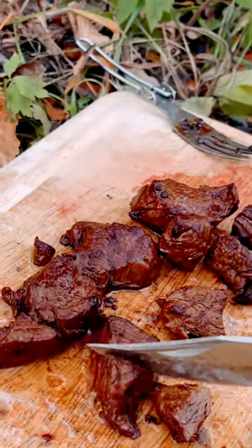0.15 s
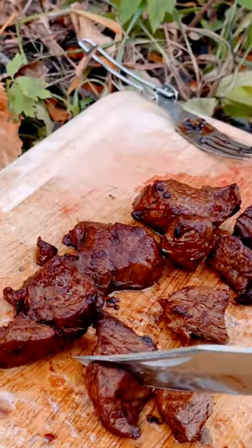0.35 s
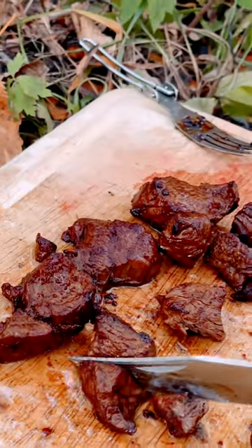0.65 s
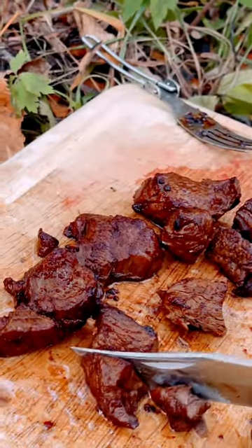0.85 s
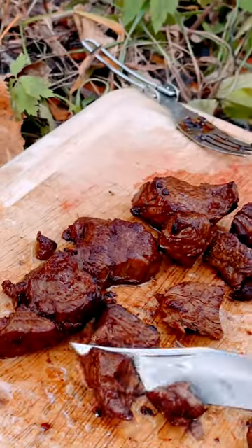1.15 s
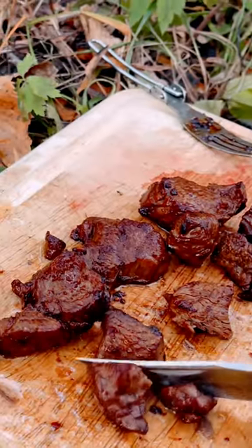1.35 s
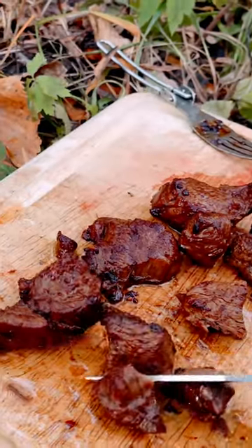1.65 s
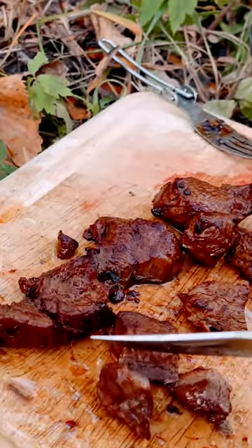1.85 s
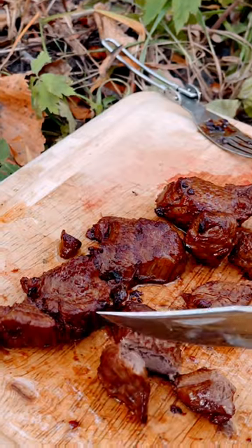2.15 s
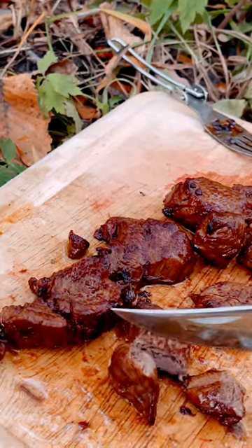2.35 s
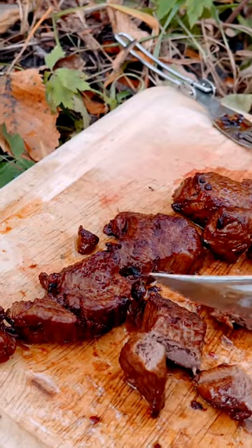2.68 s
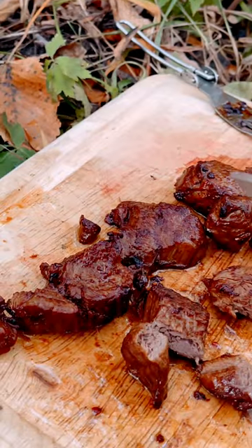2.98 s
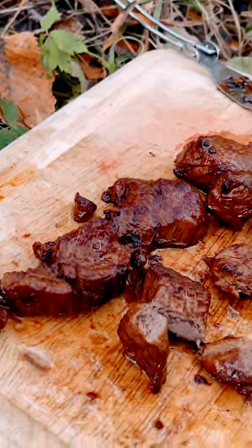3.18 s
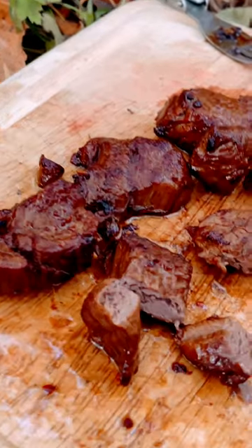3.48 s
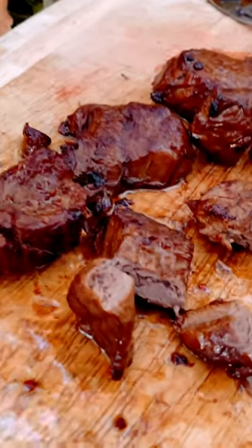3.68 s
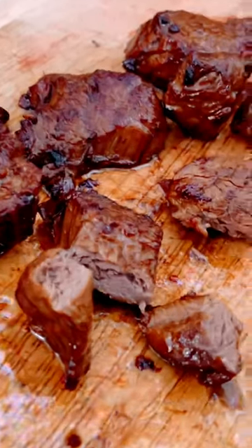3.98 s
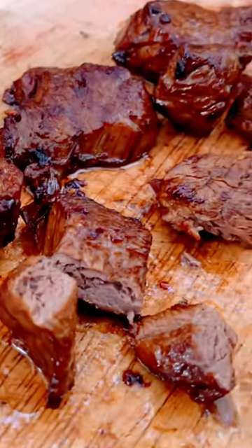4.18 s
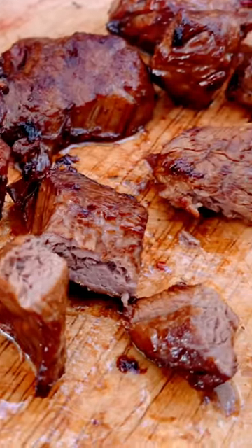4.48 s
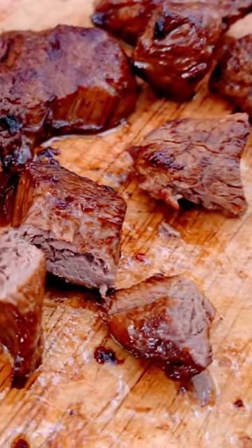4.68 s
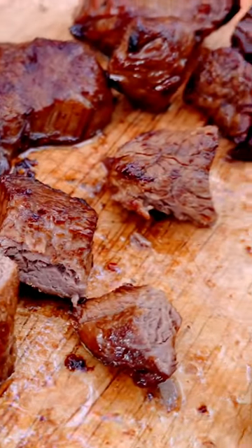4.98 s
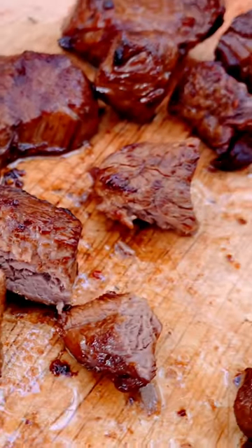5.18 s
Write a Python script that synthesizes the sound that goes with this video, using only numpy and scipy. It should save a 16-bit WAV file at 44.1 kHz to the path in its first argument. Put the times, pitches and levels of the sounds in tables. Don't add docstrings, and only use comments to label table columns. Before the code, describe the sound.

Outdoors, very close in stereo, with a quiet bed of airy hiss, low rumble and a faint wavering engine hum around 130 Hz. A small dry tick at 0.2 s starts the knife work; around 0.45 to 0.6 s ticks run into a fast cluster of short wooden knocks on the board. Light, crisp clicks and barely audible gritty slides continue irregularly to about 1.7 s. Then it is almost empty, with tiny ticks near 2.0 and 2.6 s and a faint short bird whistle at 3.1 s. Around 3.3 s come a couple of ticks and a soft narrow creak. From 3.65 s a much louder crunch of dry crust and litter swells in: dense fine crackle in pulses until about 4.5 s, then looser, separate snaps and hollow pops, especially sharp near 4.3, 4.65, 4.85 and 5.15 s. A thin falling bird whistle at 5.1 s is nearly masked.

```python
import sys
import numpy as np
from scipy import signal
from scipy.fft import rfft, irfft, next_fast_len
from scipy.io import wavfile

SR = 44100
rng = np.random.default_rng(int(sys.argv[2]) if len(sys.argv) > 2 else 0)


def waveform_to_disk(signal):
    frames = np.transpose(np.atleast_2d(signal))
    scaled = np.clip(frames, -1, 1) * 32767
    samples = np.round(scaled).astype(np.int16)
    wavfile.write(sys.argv[1], SR, samples)


def attenuation_scalar(level_db):
    decades = np.asarray(level_db, float) / 20
    return 10 ** decades


N = 235185
STEP = 40

# f/Hz, phase/rad
CRUSH_PHASE = [(0, -0.5), (860, -2.5), (4310, -7), (5860, -11), (6550, -11.5), (8010, -20.5), (8870, -20),
               (12700, -25.5), (14900, -30), (16500, -26)]
# f/Hz, level/dB
CRUSH_BALANCE = [(60, -5), (150, 0), (380, -3.5), (950, -4.5), (2380, -2), (5980, 1), (15000, -0.5)]
# t/s, crack peak level/dB, lowest mode level/dB, upper modes level/dB
BOARD_KNOCKS = [(0.515, -39.5, -65, -48.5), (0.532, -39, -60, -51), (0.544, -35.5, -41, -41.5),
                (0.551, -41.5, -45, -41), (0.56, -43.5, -34.5, -39), (0.611, -58, -64, -58),
                (0.671, -66, -68, -64), (0.775, -62, -61, -63), (0.8, -55, -50, -49.5),
                (0.819, -51, -60, -63), (1.734, -57, -67, -54.5), (3.289, -51, -72, -64)]


def crushing():
    # t/s, crack peak level/dB, middle level re crack/dB, treble tilt/(dB per octave)
    brittle = [(3.445, -56, -8, -17), (3.683, -29.5, -35, 11), (3.715, -26.5, -14, 5),
               (3.872, -28, -13.5, -11.5), (3.953, -34.5, -7.5, -9), (4.025, -28.5, -15, -5),
               (4.061, -30.5, -10, -3), (4.226, -36, -26, -3), (4.284, -18.5, -20, -5),
               (4.312, -35, -5.5, -8), (4.353, -39, -31, -4), (4.39, -36, -29, 4.5), (4.408, -40, -18, 3),
               (4.611, -37.5, -11, -8), (4.658, -35, -23, -6), (4.709, -44, -29, 11),
               (4.748, -38, -17, -13), (4.772, -31.5, -19, -1.5), (4.818, -33, -27, -3),
               (4.835, -23.5, -30, -2), (4.854, -33, -15, 9), (4.991, -36, -24, 2),
               (4.999, -34.5, -38, 7.5), (5.013, -34.5, -10.5, 2), (5.037, -44, -16, -11),
               (5.065, -38, -13, -2), (5.113, -34, -11, -1.5), (5.141, -17, -28, -8), (5.213, -31, -25, -6),
               (5.226, -22.5, -39, -6.5)]
    # t/s, crack peak level/dB, knock level re crack/dB, middle level re crack/dB
    pops = [(3.71, -31.5, -15, -26), (3.73, -31, -5, -17), (3.775, -24.5, -17, -17), (3.797, -28, -9, -27),
            (3.808, -25, -11.5, -7), (3.85, -32, -10, -8), (3.895, -32, -13, -17), (3.932, -32.5, -13, -13),
            (3.982, -24.5, -5, -10), (4.074, -30, -19, -9.5), (4.131, -33, -15, -7.5),
            (4.151, -22.5, -20.5, -11), (4.243, -33, -21, -13), (4.332, -31.5, -24, -6),
            (4.428, -37, -17, -11), (4.453, -31.5, -13.5, -15), (4.519, -29.5, -14, -11),
            (4.649, -17, -24, -42), (4.698, -46, -35, -30), (4.795, -48, -13, -6), (4.842, -20, -21, -30),
            (4.866, -22, -21.5, -32), (4.936, -28.5, -18.5, -18.5), (5.086, -45, -16, -1),
            (5.118, -33.5, -14, 1), (5.151, -22.5, -32, -18), (5.169, -22, -5.5, -11),
            (5.183, -42, -23, -26), (5.234, -40.5, -11.5, -24), (5.299, -39.5, -16, -13)]
    # t/s, hold/s, fine crackle level/dB, coarse grain level re fine/dB
    presses = [
        (3.64, 0.19, -46.5, -8),
        (3.94, 0.14, -54, -2.5),
        (4.2, 0.087, -52.5, -6),
        (4.44, 0.012, -67, 0.5),
        (4.521, .025, -55.5, -7.5),
        (4.84, 0.098, -66.5, -5),
        (4.6, .75, -68, -16),
    ]
    pop_hz = 899
    hollow = [(s, db, pop_hz, *rest) for s, db, *rest in pops]
    rows = in_full(brittle, pop_hz, knock_db=-36, hollow=hollow, tilt_db=0.8)

    s, held, fine_db, coarse_db = np.transpose(presses)
    span = 3.05, 6
    fine = grains(span, low_hz=3750, high_hz=16300, count=13, cycles=9.9, per_s=5000, size_db=4.0, own=1.0)
    medium = grains(span, low_hz=1480, high_hz=4000, count=6, cycles=8.2, per_s=3300, size_db=4.0, own=0.64)
    cavities = grains(span, low_hz=690, high_hz=1320, count=6, cycles=9.1, per_s=1500, size_db=3.0, own=0.31)
    fine_gain = effort(s, held, fine_db, rise_db=107, fall_db=350, level_db=3.9)
    fine_gain = fine_gain + crumbs(rows, level_db=-19.0, t60=0.041)
    bed = fine_gain * fine
    bed += effort(s, held, fine_db + coarse_db, rise_db=56, fall_db=150, level_db=0) * medium
    bed += effort(s, held, fine_db + coarse_db, rise_db=350, fall_db=76, level_db=2.4) * cavities

    hits = snaps(rows, part_db=[3.0, -3.0, -11.0], part_t60=[.021, .012, .007],
                 spread_s=0.002156, own_db=15.5)
    return ports(hits + bed, CRUSH_PHASE, CRUSH_BALANCE)


def creak():
    # t/s, level/dB
    swell = [(3.25, -87), (3.36, -65), (3.45, -56.5), (3.55, -56), (3.66, -68), (3.8, -95)]
    s, level_db = np.transpose(swell)
    gain = attenuation_scalar(np.interp(np.arange(N) / SR, s, level_db, left=-130, right=-130))
    rub = grains((3.2, 3.85), low_hz=1650, high_hz=2880, count=2, cycles=26.0,
                 per_s=4400, size_db=2.5, own=0.75)
    return ports(gain * rub, CRUSH_PHASE, CRUSH_BALANCE)


def knife():
    # t/s, crack peak level/dB, middle level re crack/dB, treble tilt/(dB per octave)
    ticks = [(0.162, -38, -21.5, -2.5), (0.429, -47, -8, 4.5), (0.457, -58, -19, 8), (0.623, -49.5, -19, 6),
             (0.689, -55.5, 0, 4), (0.752, -50, -14, -1), (0.875, -42, -11, -4), (0.958, -34, -14, 0.5),
             (1.048, -55, -29, -16), (1.057, -44, -27, -10), (1.124, -45.5, -30, -12),
             (1.202, -41.5, -29, -3), (1.231, -38, -39, 1), (1.493, -50.5, -11, 0), (1.531, -45, -6.5, -19),
             (1.565, -39, -8.5, -8), (1.66, -51, -18, 2), (1.69, -50, -5.5, -10), (1.72, -61, -4.5, 21),
             (2.02, -62, -6, 8), (2.577, -51, -14.5, -4), (3.344, -48, -20, -3), (3.372, -38.5, -24, -7)]
    # t/s, hold/s, level/dB
    strokes = [
        (.5, 1.05, -77.5),
        (.87, 0.023, -69.5),
        (1.06, 0.0077, -89),
        (1.21, 0.031, -66),
        (1.54, 0.027, -69.5),
    ]
    # f/Hz, phase/rad
    knife_phase = [(0, -0.5), (2500, 2.03), (3200, -3.5), (10400, -15), (16500, -25)]
    # f/Hz, level/dB
    knife_balance = [(60, 1), (180, -6), (550, 2), (1650, 0.5), (4970, 2), (15000, 1)]
    knock_hz, knock_db = 433, -36
    cracks = [(s, db, knock_hz, knock_db, -11) for s, db, *_ in BOARD_KNOCKS]
    rows = in_full(ticks, knock_hz, knock_db, hollow=cracks, tilt_db=-4.5)

    grit = grains((0, 2.3), low_hz=3530, high_hz=12200, count=10, cycles=6.1, per_s=4000, size_db=3.0, own=1.0)
    grit = signal.sosfilt(signal.butter(2, 10500, fs=SR, output="sos"), grit)
    slide_gain = effort(*np.transpose(strokes), rise_db=45, fall_db=115, level_db=4.8)
    slide_gain = slide_gain + crumbs(rows, level_db=-25, t60=0.16)

    hits = snaps(rows, part_db=[-1.5, -5.5, -13.0], part_t60=[.035, .016, .007],
                 spread_s=0.00081, own_db=20)
    return ports(hits + board(own_db=11.5) + slide_gain * grit, knife_phase, knife_balance)


def board(own_db):
    # f/Hz, level/dB, t60/s
    modes = [(419, 1, 0.037), (640, -3, 0.02), (923, -0.5, 0.028), (1370, -9, .015), (1870, -7, 0.03),
             (2610, -4.5, 0.027), (2950, -10, .018)]
    s, _, low_db, upper_db = np.transpose(BOARD_KNOCKS)
    at = np.round((s + .0006) * SR).astype(int)
    luck = rng.random((len(s), len(modes), 2)) - .5
    out = np.zeros((2, N))
    for k, (hz, level_db, t60) in enumerate(modes):
        strike_db = upper_db if k else low_db
        clicks = np.zeros((2, N))
        clicks[:, at] = attenuation_scalar(strike_db + level_db + own_db * luck[:, k].T)
        out += (-1) ** k * ring(clicks, hz, t60)
    return signal.lfilter([.3], [1, -.7], out)


def in_full(brittle, knock_hz, knock_db, hollow, tilt_db):
    rows = [(s, db, knock_hz, knock_db, middle, tilt) for s, db, middle, tilt in brittle]
    return rows + [(*row, tilt_db) for row in hollow]


def snaps(rows, part_db, part_t60, spread_s, own_db):
    low_count, middle_count, bright_count = counts = [5, 6, 20]
    length = 1600
    out, t = np.zeros((2, N + length)), np.arange(length) / SR
    luck = rng.random((len(rows), 5, sum(counts)))
    for row, (pitch, start, size, left, right) in zip(rows, luck):
        s, peak_db, knock_hz, knock_db, middle_db, tilt_db = row
        low, middle, bright = np.split(pitch, np.cumsum(counts)[:2])
        low = (np.arange(low_count) + low) / low_count
        middle = (np.arange(middle_count) + middle) / middle_count
        bright = (np.arange(bright_count) + bright) / bright_count
        hz = np.r_[knock_hz * (.62 + .92 * low), 1500 * 2.6 ** middle, 3600 + 12500 * bright]

        level_db = peak_db + np.repeat(np.add(part_db, [knock_db, middle_db, 0]), counts)
        level_db[-bright_count:] += tilt_db * np.log2(hz[-bright_count:] / 7000)
        t60 = np.repeat(part_t60, counts) * (0.89 + 0.87 * size)

        age = np.maximum(t - spread_s * start[:, None] ** 1.52, 0)
        rings = np.sin(2 * np.pi * hz[:, None] * age) * np.exp(-np.log(1000) * age / t60[:, None])
        rings *= 1 - np.exp(-age * hz[:, None] / 0.93)

        apart_db = own_db * np.repeat([.6, .9, 1], counts) * (np.array([left, right]) - .5)
        at = round((s + .0006) * SR)
        out[:, at:at + length] += attenuation_scalar(level_db + apart_db) @ rings
    return out[:, :N]


def grains(span, low_hz, high_hz, count, cycles, per_s, size_db, own):
    first, last = [min(round(s * SR), N) for s in span]
    chance, big, dealt = rng.random((3, 3, last - first))
    rate = per_sample(per_s * attenuation_scalar(4.5 * drift(35.0)))[first:last]
    born = chance < rate / SR
    clicks = np.zeros(born.shape)
    clicks[born] = attenuation_scalar(-size_db * np.log(big[born] + 0.0017)) * np.sign(dealt[born] - .5)
    pair = clicks[0] + own * clicks[1:]
    which = (dealt[0] * 2 * count).astype(int) % count
    rings = np.zeros(pair.shape)
    for k, hz in enumerate(np.geomspace(low_hz, high_hz, count)):
        rings += ring(pair * (which == k), hz, cycles / hz)
    return np.pad(rms_one(rings), ((0, 0), (first, N - last)))


def ring(clicks, hz, t60):
    r, w = attenuation_scalar(-60 / (t60 * SR)), 2 * np.pi * hz / SR
    return signal.lfilter([0, np.sin(w)], [1, -2 * r * np.cos(w), r * r], clicks + 1e-18)


def crumbs(rows, level_db, t60):
    kicks = np.zeros(N)
    kicks[[round(row[0] * SR) for row in rows]] = attenuation_scalar(np.array(rows)[:, 1] + level_db)
    return signal.lfilter([1], [1, -attenuation_scalar(-60 / (t60 * SR))], kicks)


def effort(s, held, db, rise_db, fall_db, level_db):
    t = np.arange(N // STEP + 2) * STEP / SR - np.c_[s]
    before, after = np.maximum(-t, 0), np.maximum(t - np.c_[held], 0)
    pushes = attenuation_scalar(np.c_[db] + level_db - rise_db * before - fall_db * after)
    return per_sample(pushes.sum(axis=0))


def drift(rate):
    r = np.exp(-2 * np.pi * STEP * rate / SR)
    noise = rng.standard_normal(N // STEP + 2002)
    return rms_one(signal.lfilter([1], [1, -2 * r, r * r], noise)[2000:])


def per_sample(coarse):
    return np.interp(np.arange(N) / STEP, np.arange(len(coarse)), coarse)


def rms_one(x):
    return x / np.sqrt(np.mean(x ** 2) + 1e-20)


def at_hz(points, hz):
    points = np.array(points)
    return np.interp(np.log(hz), np.log(points[:, 0]), points[:, 1])


def ports(pair, lead, shade):
    # f/Hz, level/dB
    port_response = [(150, 4), (450, -1), (900, 3.5), (2200, 1.5), (3200, -5), (4200, -5), (5500, -1),
                     (7000, 0.5), (8500, 2.5), (9800, 0.5), (10900, 7), (12000, -3.5), (13500, -41),
                     (15000, -11), (16600, -32)]
    size = next_fast_len(N + 512)
    hz = np.arange(size // 2 + 1) * SR / size + 1e-3
    turn = np.exp(1j * np.interp(hz, *np.transpose(lead)))
    half = attenuation_scalar(at_hz(shade, hz) / 2)
    spectra = rfft(pair, size) * attenuation_scalar(at_hz(port_response, hz))
    return irfft(spectra * [turn * half, 1 / half], size)[:, :N]


def hum():
    # f/Hz, peak level/dB, waver/Hz
    harmonics = [(130.2, -56.5, 0.8), (263.3, -73.5, 1.95)]
    t, waver = np.arange(N) / SR, per_sample(drift(2.6))
    apart = 0.32 * per_sample(drift(4.6)) * np.c_[[1, -1]]
    out = np.zeros((2, N))
    for hz, level_db, width in harmonics:
        gain = per_sample(attenuation_scalar(level_db + 1.55 * drift(6.9)))
        cycles = hz * t + np.cumsum(width * waver) / SR
        out += gain * np.sin(2 * np.pi * cycles + apart)
    return out


def bird():
    # t/s, length/s, from f/Hz, to f/Hz, peak level/dB
    whistles = [
        (3.13, .04, 8600, 8400, -70),
        (5.078, .065, 9250, 8100, -62),
    ]
    t, out = np.arange(N) / SR, np.zeros(N)
    for s, length, from_hz, to_hz, level_db in whistles:
        gone = np.clip((t - s) / length, 0, 1)
        phase = 2 * np.pi * np.cumsum(from_hz + (to_hz - from_hz) * gone) / SR
        out += attenuation_scalar(level_db) * np.sin(np.pi * gone) * np.sin(phase)
    return out * np.c_[[1, .6]]


def air(patchy_db):
    # f/Hz, level/(dB per Hz)
    air_spectrum = [(28, -103), (50, -87), (72, -84.5), (110, -86.5), (170, -94), (260, -96.5), (400, -107),
                    (600, -113), (1300, -112), (3200, -111), (4300, -110), (6500, -111), (9000, -114),
                    (11700, -117)]
    # f/Hz, coefficient/1
    likeness = [(60, 0.87), (150, 1), (380, -0.16), (950, 0.021), (2400, -0.11), (8000, -0.057),
                (10300, -0.46), (11900, 0.17)]
    # f/Hz, level/dB
    balance = [(60, 4), (180, -1), (550, 1.5), (1650, 7), (4970, 1.5), (15000, 1)]
    edges = np.r_[23 * 2 ** (np.arange(18) / 2), 9700, 11000, 12400]
    white = rng.standard_normal((2, 2, N)) * np.sqrt(SR / 2)
    together = drift(0.33)
    out = np.zeros((2, N))
    for k, (low, high) in enumerate(zip(edges, edges[1:])):
        band = signal.butter(2, [low, high], "band", fs=SR, output="sos")
        mid, side = signal.sosfilt(band, white[k % 2])
        hz = np.sqrt(low * high)
        alike = np.clip(at_hz(likeness, hz), -1, 1)
        shade = attenuation_scalar(at_hz(balance, hz) / 2)
        gain = per_sample(attenuation_scalar(at_hz(air_spectrum, hz) + patchy_db * (0.42 * together + drift(16.0))))
        mid = np.sqrt(1 + alike) * gain * mid
        side = np.sqrt(1 - alike) * gain * side
        out += [shade * (mid + side), (mid - side) / shade]
    return out


def housing(x):
    # f/Hz, bandwidth/Hz, added level/dB
    cavity_peaks = [(4090, 270, -1.5), (5580, 470, -4)]
    out = x
    for hz, width_hz, added_db in cavity_peaks:
        out = out + attenuation_scalar(added_db) * signal.lfilter(*signal.iirpeak(hz, hz / width_hz, SR), x)
    return out


def scene():
    near = crushing() + creak() + knife()
    return near + hum() + bird() + housing(air(patchy_db=1.83))


def mute_faint_treble(x):
    # lower edge f/Hz, threshold of the sum/(dB per Hz), of the difference/(dB per Hz)
    gates = [(9610, -109.5, -121), (10540, -112.5, -121), (10850, -115.5, -118), (11600, -115, -111),
             (12020, -111, -109), (13860, -109, -109), (15200, -109, -109), (16200, -111, -111)]
    hz, _, z = signal.stft([x[0] + x[1], x[0] - x[1]], SR, nperseg=1536, scaling="psd")
    edges = [np.searchsorted(hz, row[0]) for row in gates] + [len(hz)]
    for low, high, (_, *threshold_db) in zip(edges, edges[1:], gates):
        level_db = 10 * np.log10(np.mean(abs(z[:, low:high]) ** 2, axis=1) / 2 + 1e-30)
        z[:, low:high] *= (level_db > np.c_[threshold_db])[:, None]
    total, apart = signal.istft(z, SR, nperseg=1536, scaling="psd")[1][:, :N]
    return np.array([total + apart, total - apart]) / 2


def band_limit(x):
    return signal.sosfilt(signal.butter(12, 16990, fs=SR, output="sos"), x)


def record(dry):
    wet = signal.sosfilt(signal.butter(2, 38.0, "high", fs=SR, output="sos"), dry)
    return band_limit(mute_faint_treble(wet))


dry = scene()
out = record(dry)
waveform_to_disk(out)
```